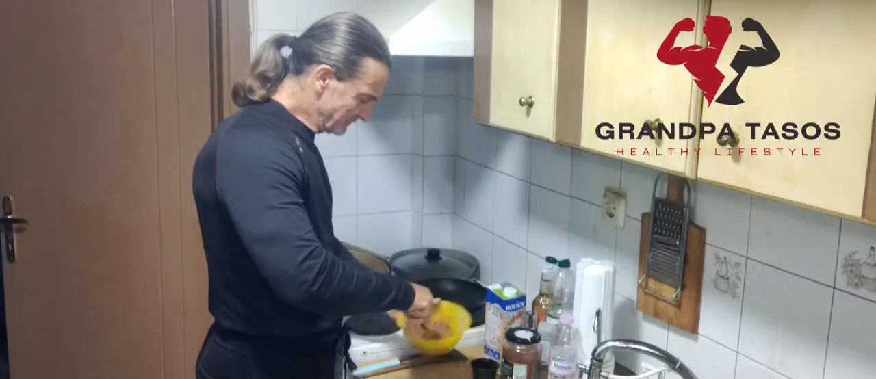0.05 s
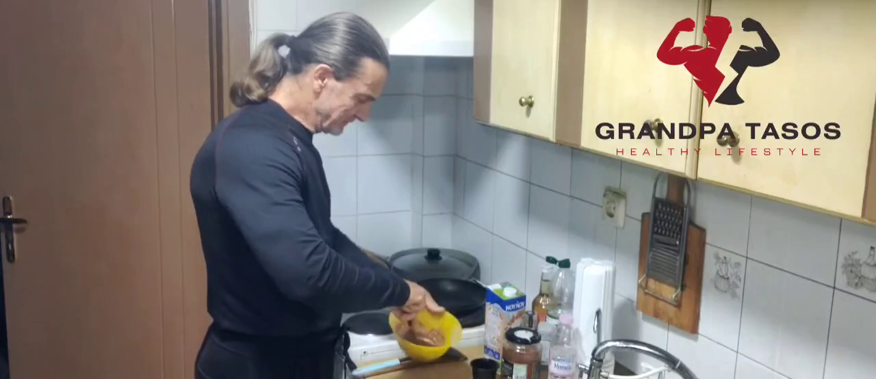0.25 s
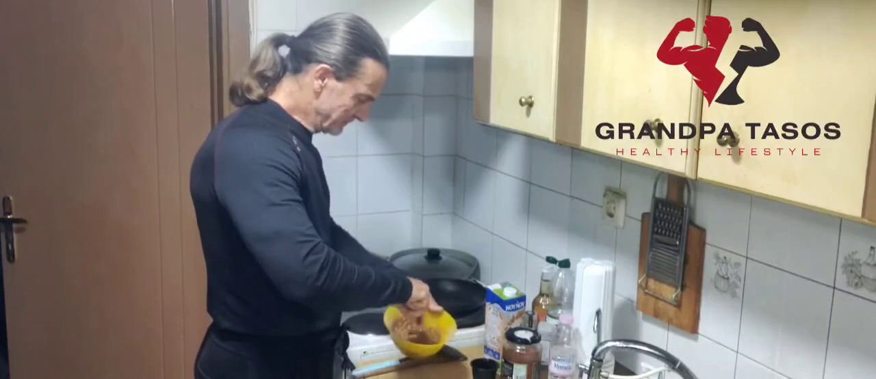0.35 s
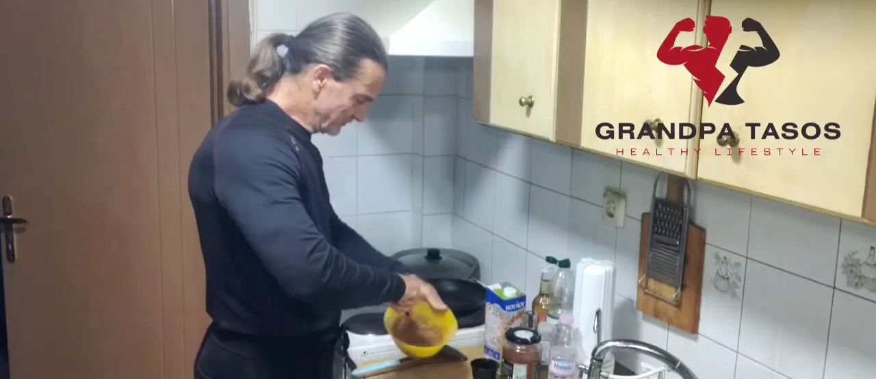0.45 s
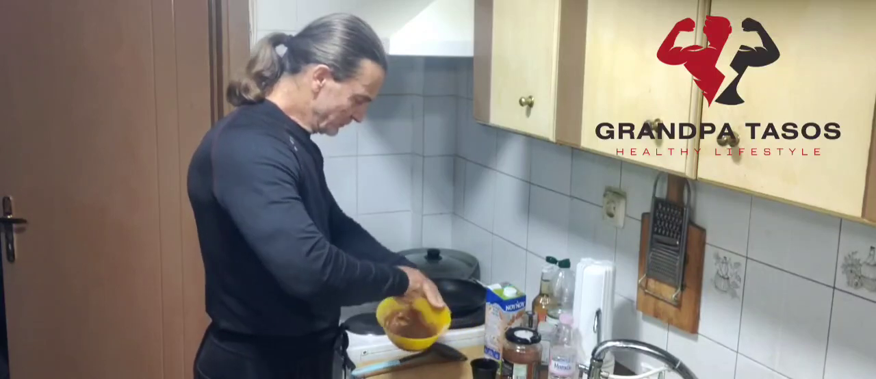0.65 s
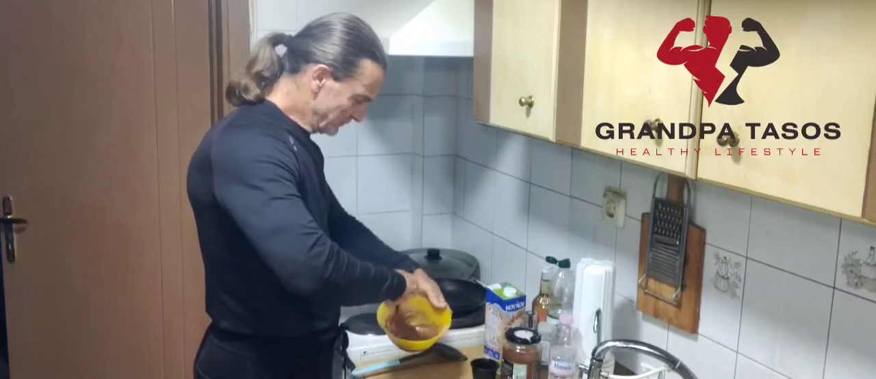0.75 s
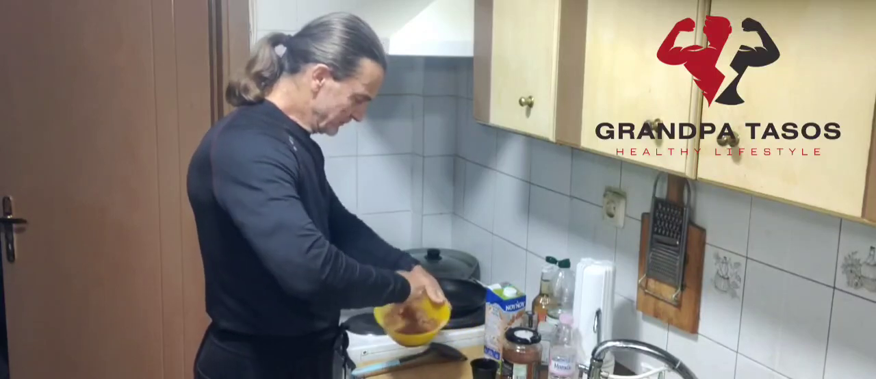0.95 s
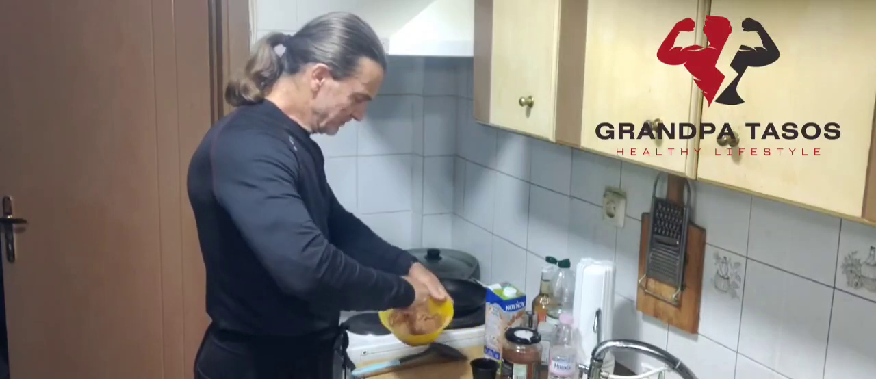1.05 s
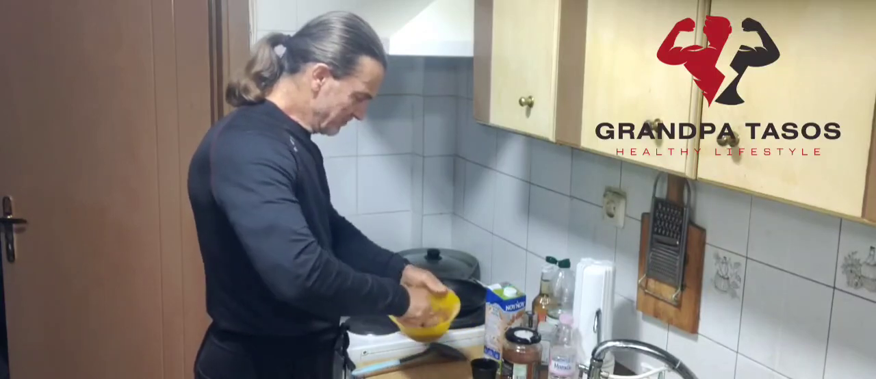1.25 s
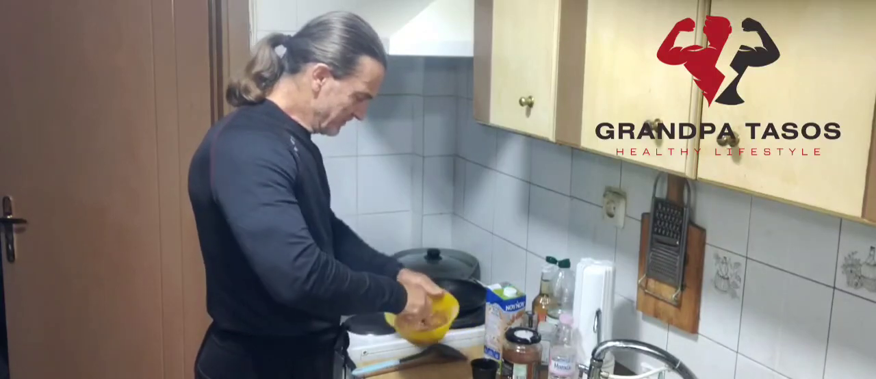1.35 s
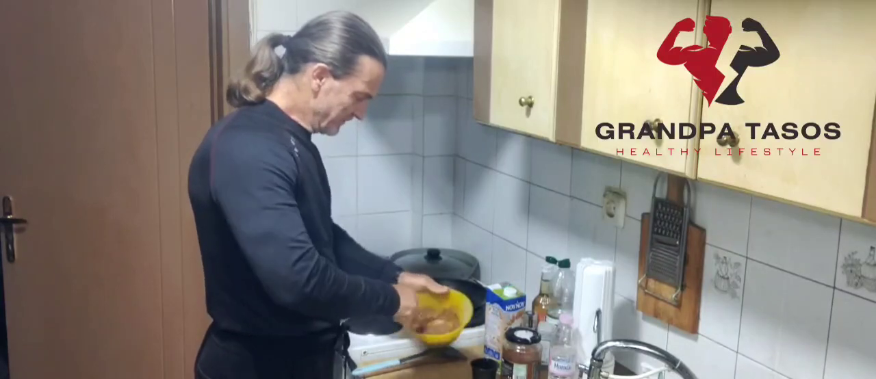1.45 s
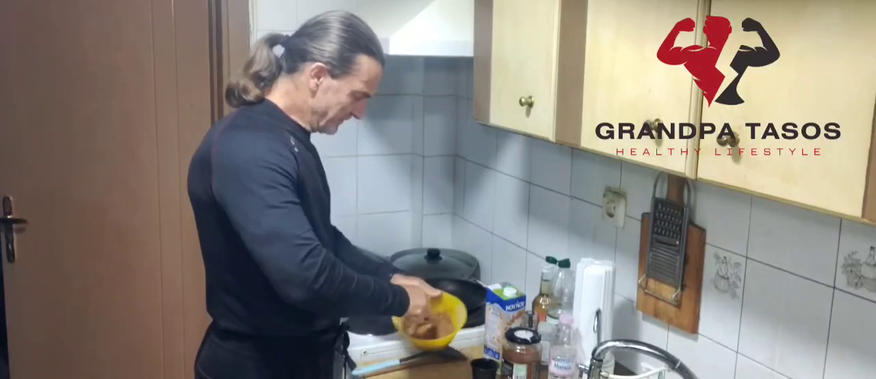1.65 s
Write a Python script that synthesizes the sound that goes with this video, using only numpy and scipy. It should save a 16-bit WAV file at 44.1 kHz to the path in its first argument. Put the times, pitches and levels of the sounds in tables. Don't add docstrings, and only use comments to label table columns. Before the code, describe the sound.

Quick uneven knocks of a fork against a plastic bowl, loudest midway, with faint wet scraping through batter between them; short tiled-kitchen echoes are cut down by phone noise suppression over very quiet room air and rumble, in mono.

```python
import sys
import numpy as np
from scipy import signal
from scipy.io import wavfile
from scipy.ndimage import uniform_filter1d

SR = 44100
rng = np.random.default_rng(int(sys.argv[2]) if len(sys.argv) > 2 else 0)


def gain_from_decibels(decibels):
    exponent = np.asarray(decibels, float) / 20
    return 10 ** exponent


def generate_wav(signal):
    frames = np.transpose(np.atleast_2d(signal))
    scaled = np.clip(frames, -1, 1) * 32767
    pcm = np.round(scaled).astype(np.int16)
    wavfile.write(sys.argv[1], SR, pcm)


N = 74970
LEAD = 4410
TAIL = 15000

# start_s, thud_db, body_db, wall_db, tines_db
STROKE_KNOCKS = [(-.035, -28, -32.5, -39.5, -34), (0.17, -64.5, -51.5, -31.5, -51),
                 (0.2194, -19.5, -19, -29, -37.5), (0.4862, -25, -23, -27.5, -31.5),
                 (0.7317, -14.5, -14.5, -13.5, -10.5), (.9940, -25, -29, -25.5, -30),
                 (1.2507, -35, -26.5, -32.5, -25), (1.4558, -32, -35.5, -44.5, -34),
                 (1.477, -40, -45, -79, -37), (1.5139, -44, -44, -46, -37.5), (1.55, -60, -53, -69, -76)]
# start_s, level_db, pitch_hz, width_hz
WET_TICKS = [(0.1064, -55, 5300, 2030), (.395, -50.5, 5850, 1500), (.9510, -53.5, 6500, 1476),
             (.972, -60, 5630, 2500), (1.637, -49, 5400, 2500), (1.652, -67.5, 3480, 400),
             (.150, -40, 4400, 1200), (.2194, -44, 4770, 1200), (.9945, -38.5, 6490, 2020),
             (1.4605, -38.5, 6230, 1600), (1.5138, -35.5, 5640, 2400), (1.517, -48, 2300, 780)]
# peak_s, rise_s, fall_s, level_db, slurp_db (relative to the hiss)
TINE_DRAGS = [(.0, 0.022, 0.053, -67, 7.5), (0.154, 0.0069, 0.017, -49, -24),
              (0.174, 0.028, 0.025, -48.5, -7), (0.261, 0.033, 0.014, -56.5, -1),
              (.36, 0.051, 0.016, -75, 7), (0.798, 0.038, 0.016, -43, -20.5),
              (0.514, 0.014, 0.034, -56.5, 7), (0.57, 0.031, 0.0065, -59, -12),
              (0.848, 0.045, 0.016, -51.5, -30.5), (.985, 0.024, 0.011, -64.5, -2.5),
              (1.04, 0.015, 0.024, -48, -1.5), (1.093, 0.026, 0.0062, -59, 4),
              (1.278, 0.016, 0.011, -36.5, -13.5), (1.349, .025, 0.014, -54, -7),
              (1.454, 0.015, 0.008, -65.5, 1), (1.473, 0.025, .015, -52, -11),
              (1.532, 0.013, 0.021, -57.5, -5), (1.57, 0.017, 0.061, -68.5, -8.5)]

# pitch_hz, width_hz, level_db
BOWL_THUD = [(176, 180, -26.5), (342.5, 126, -8), (416.3, 162.5, -3), (592, 136, -4)]
BOWL_BODY = [(683, 68, -8), (768, 86, 1), (962, 195, 4.5), (1252, 150, -3.5)]
BOWL_WALL = [(1400, 107, -1), (1868, 370, 6.5), (2300, 182, -2.5), (2690, 278, -1.5)]
FORK_TINES = [(3830, 990, 9), (4604, 313, 0.5), (5650, 1200, 7.5), (9960, 9200, 0.5)]
# low_hz, high_hz
PART_RANGES = [(140, 750), (560, 1670), (1250, 3200), (3200, 22000)]
# pitch_hz, width_hz, level_db
BATTER_HISS = [(3290, 505, -12), (4400, 1430, 2), (5370, 1950, 6.5), (7870, 2040, -0.5), (9400, 1920, -4.5),
               (13900, 6000, -62.5)]
BATTER_SLURP = [(970, 490, -4), (1600, 390, -12.5), (2760, 1940, 4.5)]

# delay_s, level_db
FIRST_ECHOES = [(.0045, 4), (.007, -7), (0.0178, -8), (0.025, -3.5)]
# pitch_hz, t60_s
KITCHEN_DECAY = [(300, 0.46), (900, 0.68), (2500, 0.36), (6000, 0.19), (9000, 0.11), (14000, 0.34)]
# pitch_hz, first_step_db, slope_db_per_s
SUPPRESSOR_PULL = [(400, -4.5, -150), (962, -6.5, -200), (2500, -7, -120), (6070, 0, -60), (12000, -1, -49)]
# pitch_hz, level_db (per Hz)
AIR_SPECTRUM = [(25, -24), (45, -9), (85, -1), (200, -11), (400, -11.5), (1000, -16), (5800, -31),
                (9000, -30.5), (15500, -35.5)]


def at_hz(points, hz):
    table = np.array(points)
    return np.interp(np.log(hz), np.log(table[:, 0]), table[:, 1])


def rms_one(x):
    return x / np.sqrt(np.mean(x ** 2) + 1e-20)


def drift(rate_hz, size):
    r = np.exp(-2 * np.pi * rate_hz / SR)
    wander = signal.lfilter([1], [1, -2 * r, r * r], rng.standard_normal(size + 4000))
    return rms_one(wander[4000:])


def bandpass(x, low_hz, high_hz, order=2):
    return signal.sosfilt(signal.butter(order, [low_hz, high_hz], "band", fs=SR, output="sos"), x)


def resonate(x, peaks, spread_db=0):
    out = 0
    for k, (hz, width_hz, db) in enumerate(peaks):
        r = np.exp(-np.pi * width_hz / SR)
        w = 2 * np.pi * hz / SR
        gain = gain_from_decibels(db + spread_db * rng.standard_normal()) * (-1) ** k
        out = out + gain * signal.lfilter([0, np.sin(w)], [1, -2 * r * np.cos(w), r * r], x + 1e-18)
    return out


def convolve(a, b):
    return signal.fftconvolve(a, b)[:len(a)]


def unit_click():
    return np.eye(1, TAIL)[0]


def add(out, start_s, sound):
    i = LEAD + int(start_s * SR)
    out[i:i + len(sound)] += sound[:len(out) - i]


def kitchen():
    hold_s, clamp_s, build_s, lump_db = 0.048, 0.0029, 0.003, 2
    t = np.arange(TAIL) / SR
    late = np.maximum(t - hold_s, 0)
    white = rng.standard_normal(TAIL)
    slopes = np.delete(SUPPRESSOR_PULL, 1, axis=1)
    edges = 100 * 2 ** np.arange(0, 7.4, .4)
    tail = 0
    for k, (lo, hi) in enumerate(zip(edges, edges[1:])):
        hz = np.sqrt(lo * hi)
        band = bandpass(white, lo, hi)
        power = uniform_filter1d(band ** 2, size=int(SR * 5 / (hi - lo)) + 300)
        band = band * np.sqrt(2 * (hi - lo) / SR / (power + 1e-9))
        clamp_db = at_hz(SUPPRESSOR_PULL, hz) * np.minimum(late / clamp_s, 1) + at_hz(slopes, hz) * late
        tail = tail + (-1) ** k * band * gain_from_decibels(clamp_db - 60 * t / at_hz(KITCHEN_DECAY, hz))
    build = 1 - np.exp(-(t / build_s) ** 2)
    return tail * gain_from_decibels(lump_db * drift(140, size=TAIL)) * build


def in_kitchen(burst, tail, room_db=0):
    early_cut_hz, tail_db = 2100, -23
    early = np.zeros(TAIL)
    for delay_s, db in FIRST_ECHOES:
        early[int(delay_s * SR)] = gain_from_decibels(db)
    early = signal.lfilter(*signal.butter(1, early_cut_hz, fs=SR), early)
    answer = gain_from_decibels(room_db) * (gain_from_decibels(tail_db) * tail + early)
    answer[0] += 1
    return convolve(burst, answer)


def knocks(tails):
    strike_spread_db = 1.19
    out = np.zeros(N + LEAD)
    parts = (BOWL_THUD, BOWL_BODY, BOWL_WALL, FORK_TINES)
    for j, (start_s, *levels_db) in enumerate(STROKE_KNOCKS):
        for k, part in enumerate(parts):
            ring = bandpass(resonate(unit_click(), part, strike_spread_db), *PART_RANGES[k])
            burst = -gain_from_decibels(levels_db[k] - 7) * ring
            add(out, start_s, in_kitchen(burst, tails[(4 * j + k) % len(tails)]))
    return out[LEAD:]


def batter_grains():
    grains_per_s, spread_db = 3000, 4
    size = N + LEAD
    snaps = (rng.random(size) < grains_per_s / SR) * rng.choice([-1, 1], size)
    return snaps * gain_from_decibels(spread_db * np.minimum(rng.exponential(1, size), 4))


def drags():
    room_db = -28.5
    t = (np.arange(N + LEAD) - LEAD) / SR
    hiss = rms_one(resonate(batter_grains(), BATTER_HISS))
    slurp = rms_one(resonate(batter_grains(), BATTER_SLURP))
    out = 0
    for peak_s, rise_s, fall_s, db, slurp_db in TINE_DRAGS:
        swell = np.exp(-((t - peak_s) / np.where(t < peak_s, rise_s, fall_s)) ** 2)
        out = out + gain_from_decibels(db) * swell * (hiss + gain_from_decibels(slurp_db) * slurp)
    return (out + gain_from_decibels(room_db) * convolve(out, kitchen()))[LEAD:]


def kitchen_air(opened):
    level_db, opens_db, flicker_db = -68.5, 1, 0.91
    white = rng.standard_normal((2, N + LEAD))
    edges = 25 * 2 ** np.arange(0, 9.4, .5)
    out = 0
    for k, (lo, hi) in enumerate(zip(edges, edges[1:])):
        band = bandpass(white[k % 2], lo, hi)[LEAD:]
        out = out + band * gain_from_decibels(at_hz(AIR_SPECTRUM, np.sqrt(lo * hi)) + flicker_db * drift(40, size=N))
    return gain_from_decibels(level_db + opens_db * opened) * rms_one(out)


def rumble(opened):
    level_db, opens_db, patch_db = -73.5, 2, 2
    low = resonate(rng.standard_normal(N + LEAD), [(85, 60, 0), (180, 90, -8)])
    return gain_from_decibels(level_db + opens_db * opened + patch_db * drift(4.1, size=N)) * rms_one(low[LEAD:])


def ticks(tails):
    t60_s, room_db = 0.21, 5.5
    out = np.zeros(N + LEAD)
    fade = gain_from_decibels(-60 * np.arange(TAIL) / SR / t60_s)
    for j, (start_s, db, hz, width_hz) in enumerate(WET_TICKS):
        tick = bandpass(unit_click(), hz - width_hz / 2, hz + width_hz / 2, order=3)
        tick = gain_from_decibels(db) * tick / np.abs(tick).max()
        add(out, start_s, fade * in_kitchen(tick, tails[j % len(tails)], room_db))
    return out[LEAD:]


def suppressor_opening(action):
    loud = np.log(uniform_filter1d(action ** 2, size=2000) + 1e-8)
    return (loud - loud.mean()) / loud.std()


def scene():
    tails = [kitchen() for _ in range(9)]
    action = knocks(tails) + drags() + ticks(tails)
    opened = suppressor_opening(action)
    return (action + kitchen_air(opened) + rumble(opened))[None]


def roll_off(x):
    return signal.sosfilt(signal.butter(12, 16500, fs=SR, output="sos"), x)


def record(dry):
    x = signal.sosfilt(signal.butter(2, 45, "high", fs=SR, output="sos"), dry)
    x = signal.sosfilt(signal.ellip(10, .5, 45, 15500, fs=SR, output="sos"), x)
    return roll_off(x)


dry = scene()
out = record(dry)
generate_wav(out)
```